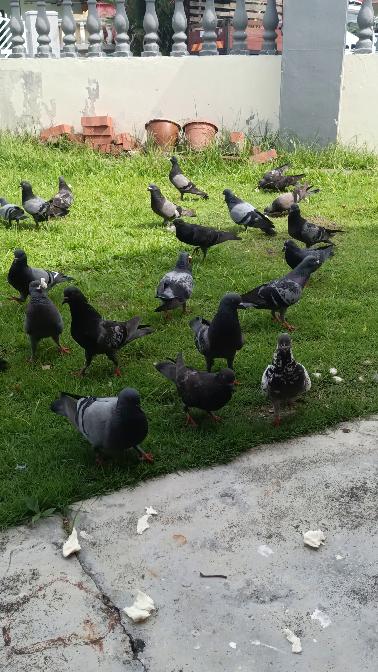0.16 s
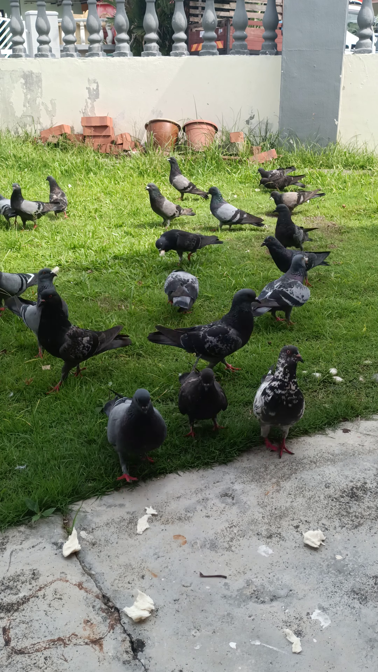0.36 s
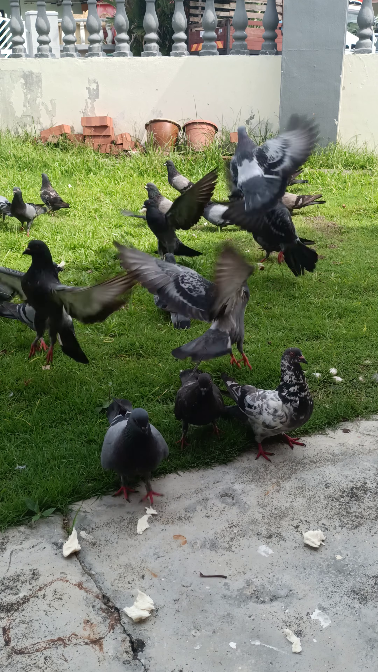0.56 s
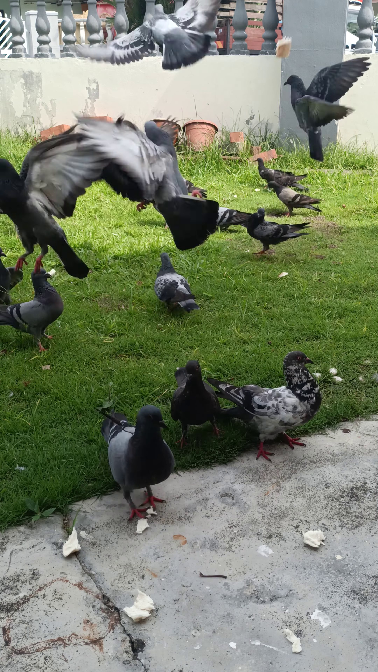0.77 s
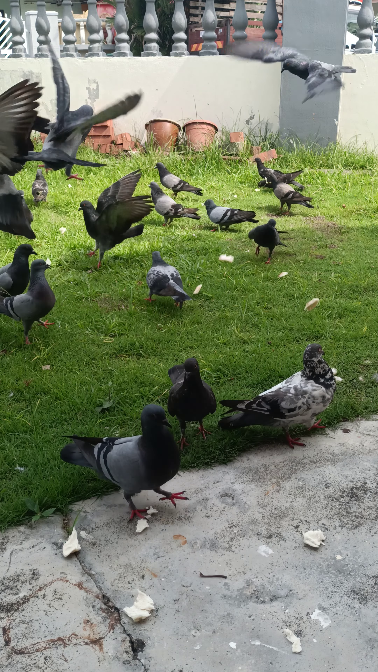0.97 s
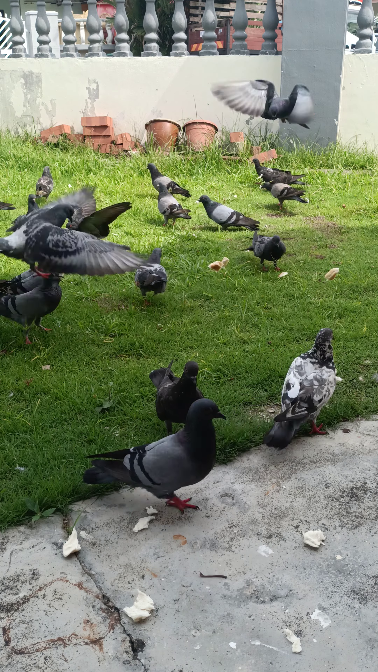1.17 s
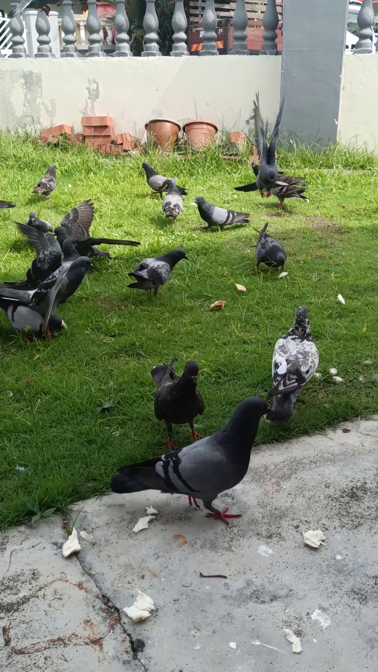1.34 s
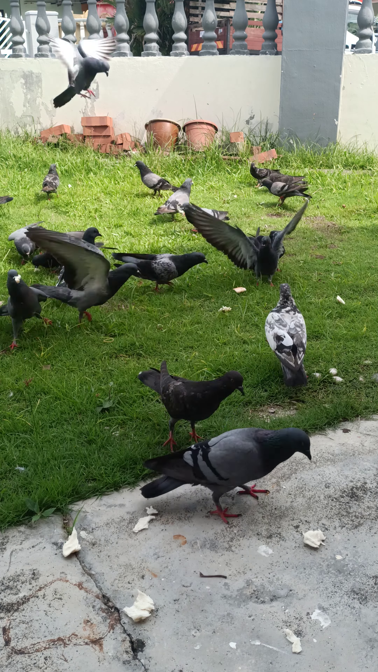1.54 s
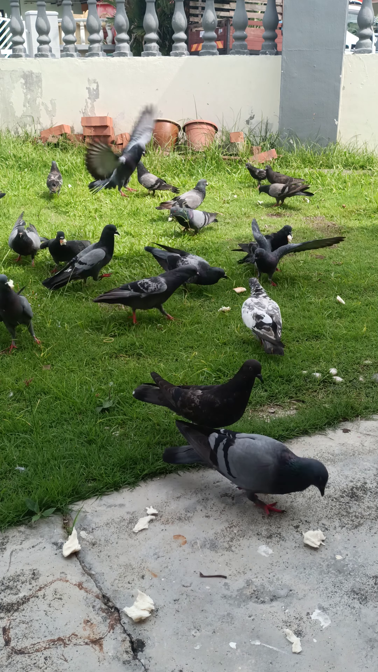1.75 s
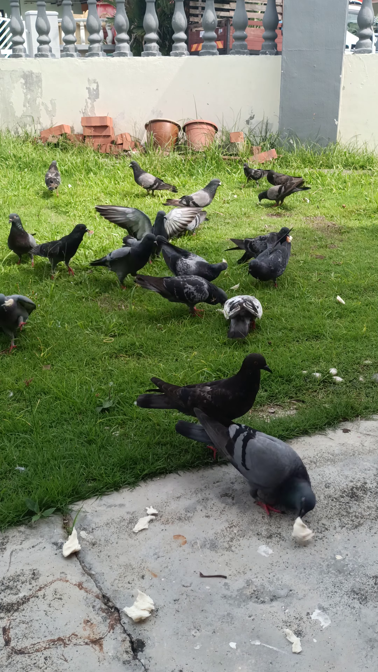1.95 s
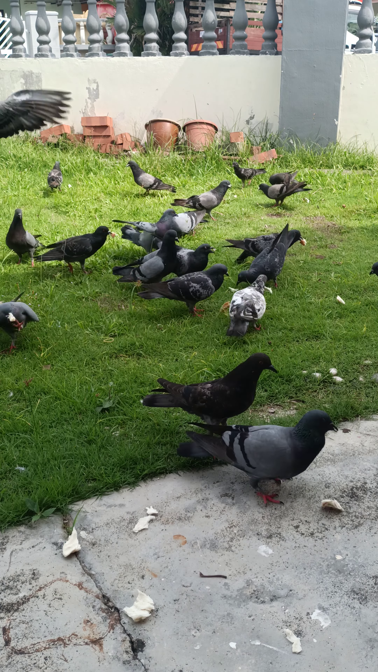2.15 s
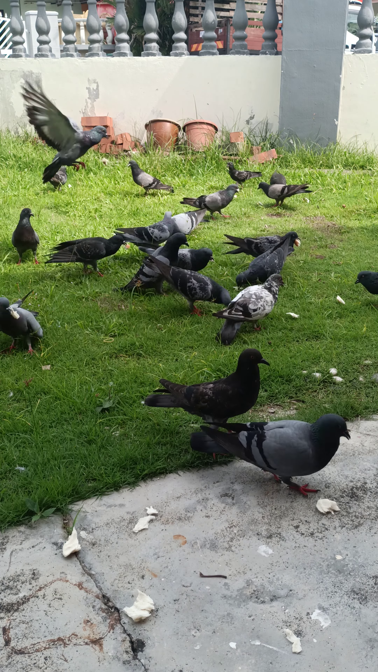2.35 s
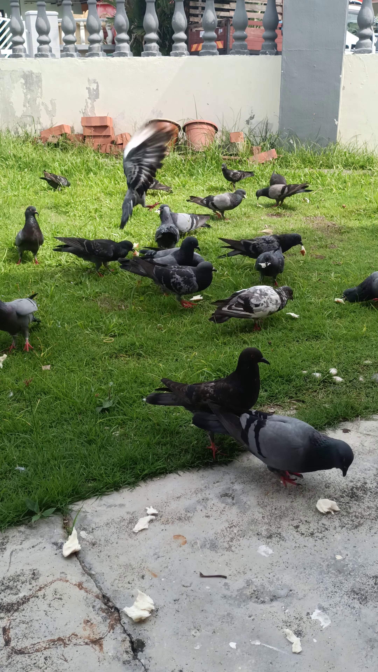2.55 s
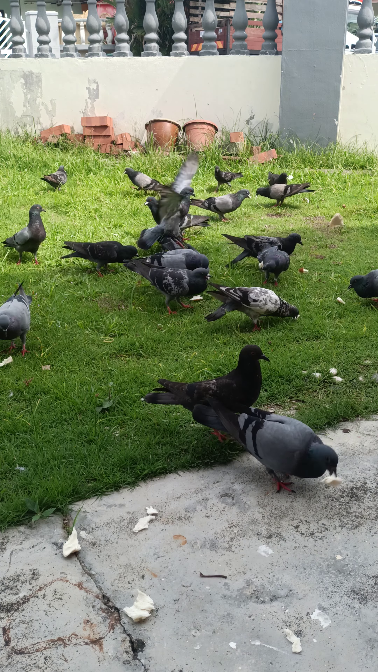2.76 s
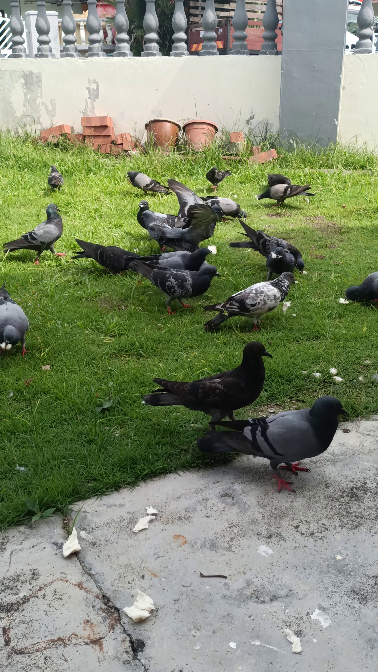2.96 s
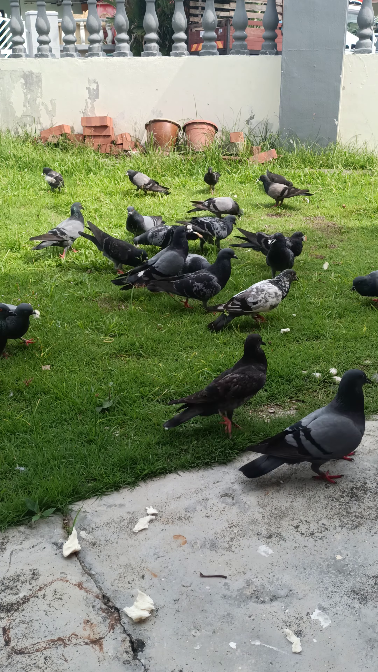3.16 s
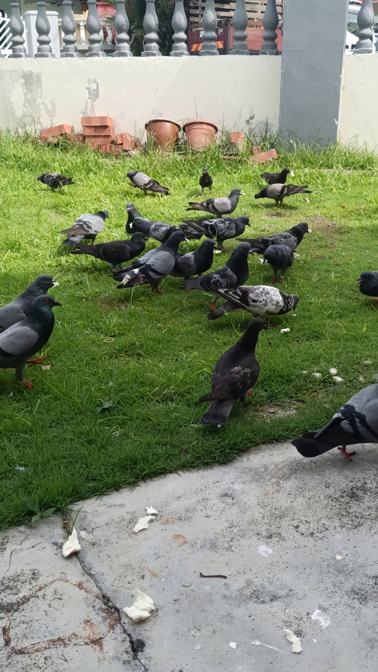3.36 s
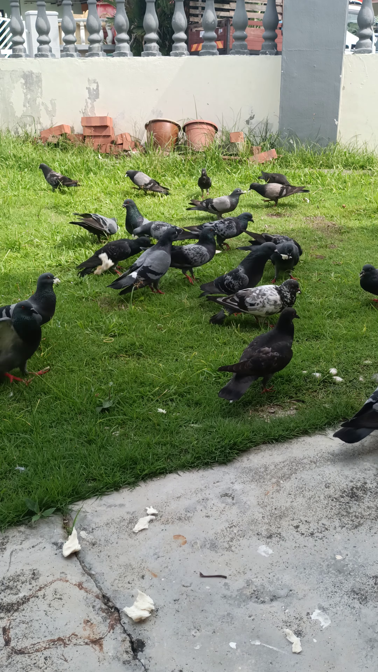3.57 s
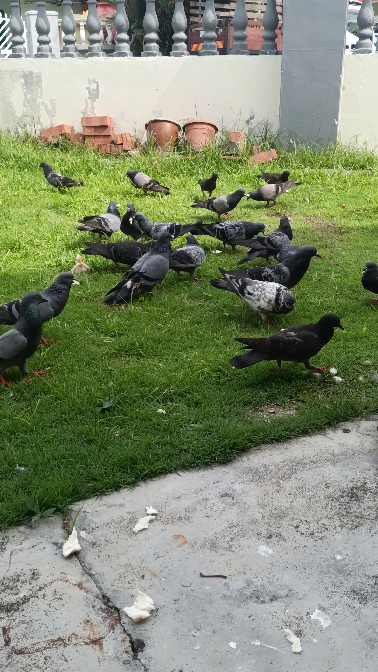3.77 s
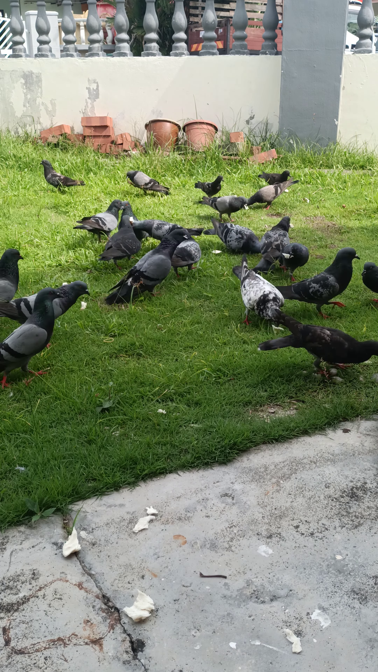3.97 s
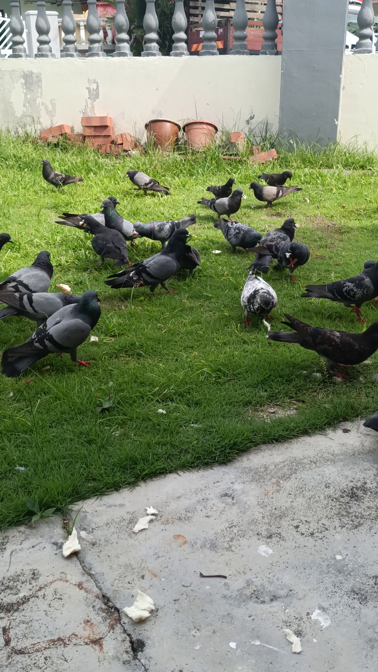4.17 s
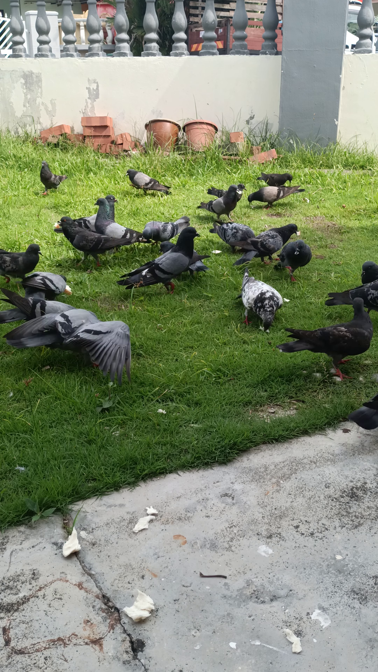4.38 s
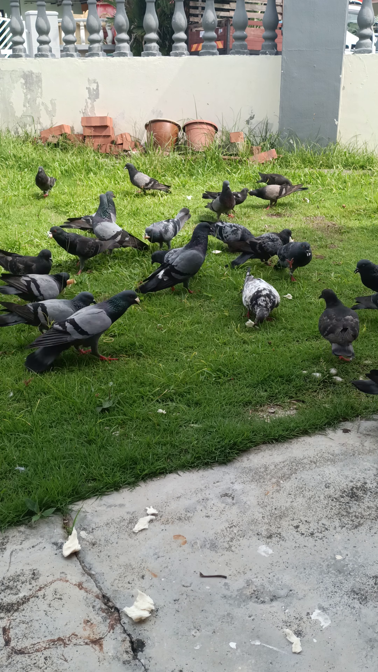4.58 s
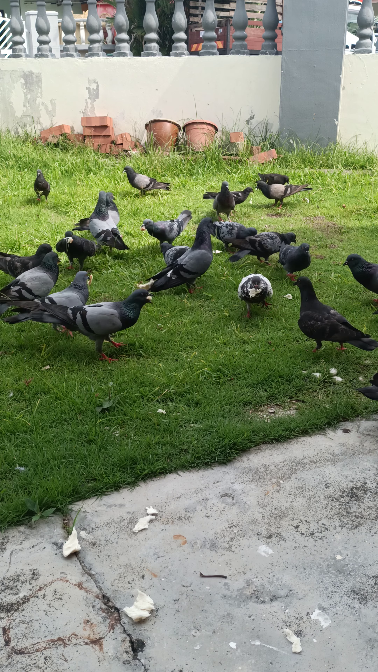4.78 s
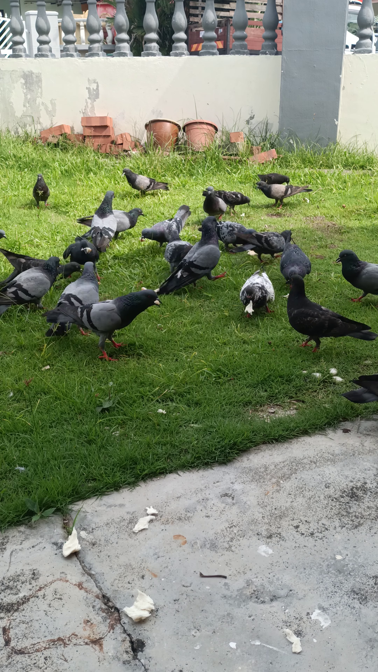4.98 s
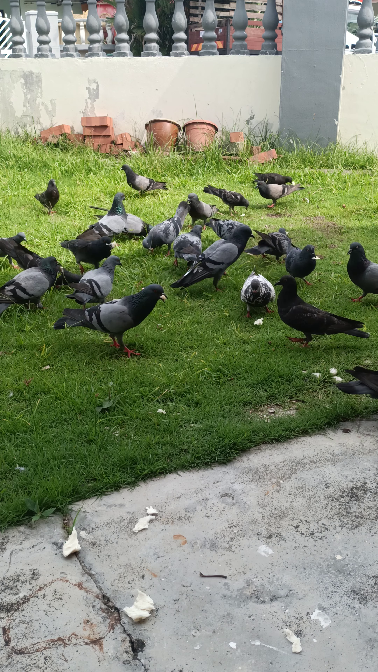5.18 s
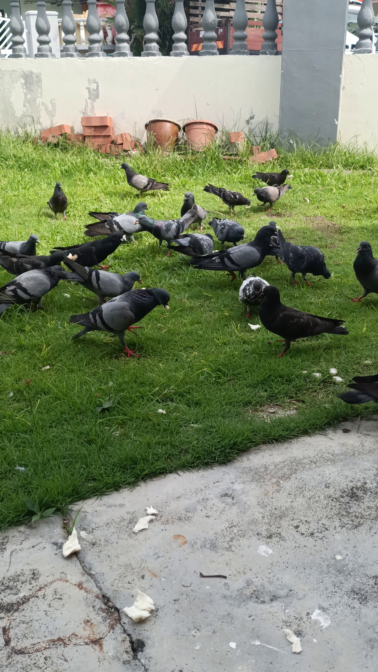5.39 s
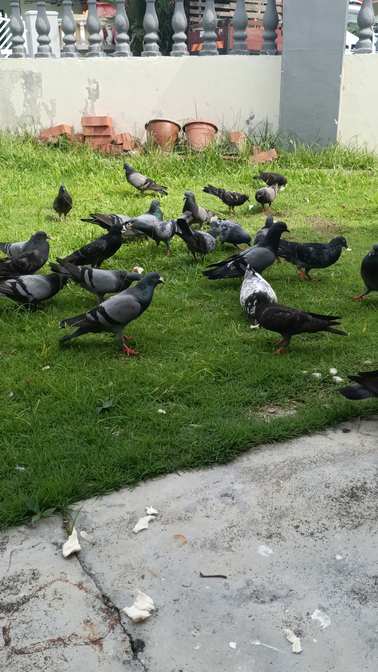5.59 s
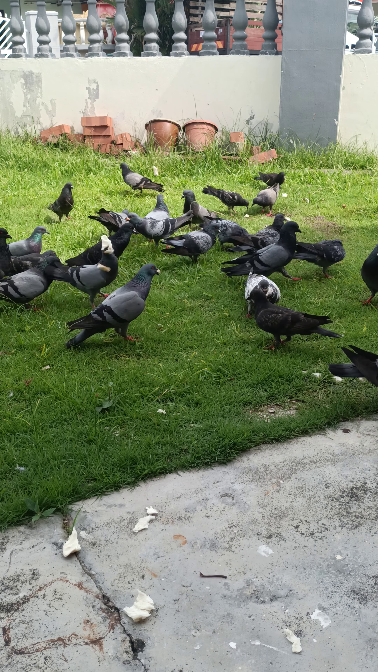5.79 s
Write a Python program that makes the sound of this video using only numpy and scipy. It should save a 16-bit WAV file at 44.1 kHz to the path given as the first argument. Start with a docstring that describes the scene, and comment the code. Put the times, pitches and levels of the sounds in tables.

```python
"""First a soft rustle of feathers over a far traffic hum; then pigeons burst up from a walled lawn with sharp
wing claps. One flies round with whistling beats and lands; later feathers only rustle now and then, beaks tap
and sparrows chirp faintly. Claps are cracks of noise with a ringing air pocket, whistles are blurred partials
on each downstroke, feathers are flickering noise in many bands, and the yard is coloured noise."""
import sys
import numpy as np
from scipy import signal
from scipy.fft import rfft, irfft, next_fast_len
from scipy.io import wavfile

SR = 44100
rng = np.random.default_rng(int(sys.argv[2]) if len(sys.argv) > 2 else 0)


def generate_wav(sig):
    """Save sig (samples, or channels by samples) to the path in sys.argv[1] as 16-bit PCM at SR."""
    pcm = np.round(np.clip(np.atleast_2d(sig).T, -1, 1) * 32767).astype(np.int16)
    wavfile.write(sys.argv[1], SR, pcm)


def attenuation_scalar(level_db):
    """Turn a level in dB into a linear amplitude multiplier (20 dB per decade)."""
    decades = np.asarray(level_db, float) / 20
    return 10 ** decades


N = 257103   # samples
SIZE = next_fast_len(N + 8192)   # transform length, samples
HZ = np.maximum(np.arange(SIZE // 2 + 1) * SR / SIZE, 1)   # frequency of every bin

# Levels and pitches below are nominal: flicker, waver, panning and the microphone come on top.

# colour of the yard: (frequency [Hz], density [dB])
YARD_COLOUR = [(12, -68), (20, -23), (57, -9), (92, -2), (135, -4.5), (190, -13), (240, -15.5), (289, -8.5),
               (420, -14), (620, -16), (760, -24.5), (950, -24), (1840, -29.5), (3200, -30), (6000, -32),
               (9000, -31.5), (13200, -31.5), (15000, -33)]
TRAFFIC_DB, AIR_DB = -58, -62.5
# likeness of left and right for far sounds: (frequency [Hz], correlation [-1 to 1])
FAR_ALIKE = [(60, 1), (150, 0.9), (380, 0.72), (950, 0.17), (2380, 0.0195), (5980, 0.0093), (15000, 0.02)]
# likeness of left and right for near sounds: (frequency [Hz], correlation [-1 to 1])
NEAR_ALIKE = [(60, 0.98), (150, 0.97), (380, 0.86), (950, 0.77), (2380, 0.21), (5980, 0.65), (15000, -0.98)]

# sparrow chirps: (time [s], length [s], pitch [Hz], level [dB])
CHIRPS = [(1.79, 0.071, 4150, -51.5), (2.187, 0.047, 3510, -57), (2.352, 0.055, 3940, -57.5),
          (2.966, 0.11, 4000, -59.5), (3.417, 0.071, 4460, -56.5), (3.658, 0.084, 3190, -59.5),
          (4.03, 0.12, 4270, -67)]
WARBLE_HZ, WARBLE_SWING_HZ, CHIRP_BLUR_DB = 430, 520, -2   # the blur is set against the note
# thin whistles: (time [s], length [s], from pitch [Hz], to pitch [Hz], level [dB])
FAINT_TONES = [(5.035, .11, 1120, 1480, -67), (3.94, .13, 850, 850, -71), (5.62, .05, 1720, 1720, -70)]
# beaks tapping the ground: (time [s], level [dB], middle frequency [Hz])
PECKS = [(2.955, -56, 12000), (3.137, -54.5, 2400), (3.759, -62, 2300), (4.992, -64, 3000),
         (5.248, -59, 2350), (5.258, -59, 2300)]

# downstrokes of the circling bird: (start [s], length [s], whistle level [dB], strongest partial [Hz],
# swish level [dB], peak position [share of stroke], lowest partial against whistle [dB])
STROKES = [(1.446, 0.026, -49.5, 1186, -70, 0.37, -18), (1.578, 0.053, -52.5, 1325, -52.5, 0.39, -4.5),
           (1.691, 0.064, -51, 1214, -49.5, 0.52, -12), (1.821, 0.08, -54, 1244, -55.5, 0.48, -8),
           (1.947, 0.083, -56, 1373, -55.5, 0.41, 1), (2.07, 0.081, -53.5, 1304, -54.5, 0.41, -5),
           (2.204, 0.072, -57.5, 1287, -57, 0.44, -1.5), (2.325, 0.058, -51, 1166, -58.5, 0.23, -10.5),
           (2.456, 0.046, -55, 1134, -61, 0.52, -10), (2.607, 0.047, -54.5, 1457, -66, 0.3, -15),
           (2.723, 0.063, -46, 1453, -53.5, 0.19, -3), (2.828, 0.044, -52.5, 1114, -58, 0.28, 1.5)]
# partials of the whistle: (multiple of the lowest partial, level [dB])
WHISTLE_PARTIALS = [(2, 1), (3, -8.5), (4, -13), (5, -27), (6, -28)]
WHISTLE_LEAD_S, STROKE_EDGE_S = 0.00404, 0.022   # whistle starts early; strokes spill past their ends
WHISTLE_SHARPNESS, SWISH_SHARPNESS = 1.8, 0.71   # exponents of the humps
STROKE_HISS_DB, STROKE_PUMP_DB, STROKE_WHOOSH_DB = -3.5, -18, -7.5   # against the swish
WHOOSH_LOW_HZ, WHOOSH_HIGH_HZ = 900, 4000
STROKE_PAN_DB, FLOCK_PAN_DB = 4.5, 0.5   # left against right
# short feather whistle notes, within a stroke or alone: (middle [s], length [s], pitch [Hz], level [dB])
FEATHER_NOTES = [(1.195, 0.039, 1220, -55), (1.322, .02, 1215, -45), (1.868, .03, 1106, -55),
                 (1.962, 0.021, 1226, -58), (1.995, 0.011, 1190, -44.5), (2.124, 0.032, 1117, -49),
                 (2.22, 0.016, 1230, -49.5), (2.251, .018, 1283, -43.5), (2.312, 0.013, 1280, -55),
                 (2.343, 0.022, 1165, -44.5), (2.473, .03, 1129, -44.5), (2.504, 0.023, 1078, -51.5),
                 (2.638, .02, 1120, -55), (2.727, 0.022, 1404, -42.5), (2.755, 0.037, 1185, -51)]
FEATHER_SAG = 0.046   # share of pitch lost over the note

# single wings shove a lump of air: (middle [s], length [s], pitch [Hz], level [dB])
WHUMPS = [(.636, .025, 397, -38), (.701, .022, 392, -27), (.72, .018, 367, -29), (.752, 0.015, 388, -32.5),
          (.79, 0.017, 295, -29), (.826, 0.022, 318, -30), (.848, .025, 335, -34), (.868, 0.017, 325, -34),
          (.89, .025, 411, -34.5), (.937, 0.011, 760, -34.5), (.955, 0.022, 412, -44),
          (1.241, 0.016, 288, -43.5), (1.363, 0.016, 444, -34), (1.397, 0.026, 460, -41),
          (2.711, .022, 303, -48)]
# the flock takes off and settles: (time [s], feather hiss [dB], wing rush [dB])
FLURRY = [(0.38, -71, -80), (0.488, -63, -66), (0.564, -48, -44), (0.688, -35.5, -46), (0.74, -40.5, -40.5),
          (0.84, -42, -35.5), (0.888, -45, -38.5), (1.006, -57, -51.5), (1.056, -52.5, -59),
          (1.244, -47, -49), (1.5, -52.5, -56), (1.95, -57, -61), (2.4, -64.5, -65.5), (2.66, -64, -59.5),
          (2.92, -65, -74), (3.3, -66, -65.5), (3.8, -65, -69.5), (4.0, -101, -88)]
# air pushed by the take-off: (time [s], pumped air [dB], gust [dB])
DRAUGHT = [(0.48, -62, -70), (0.62, -56, -67), (0.66, -39, -44), (0.72, -44, -60), (0.8, -39.5, -37.5),
           (0.86, -36, -46), (0.94, -48, -54.5), (1.16, -62.5, -58), (1.25, -48, -64), (1.31, -58.5, -62),
           (1.37, -50, -49), (1.46, -61.5, -57), (2.3, -66.5, -65), (3.0, -61.5, -66.5)]
# shaken plumage: (middle [s], length [s], hiss [dB], rush [dB])
RUSTLES = [(0.141, 0.1, -58, -70), (0.273, 0.044, -63.5, -85), (0.512, 0.036, -49, -55),
           (2.029, 0.047, -46, -69), (2.582, 0.016, -51.5, -72), (2.624, 0.17, -63, -70),
           (3.077, .04, -68, -84), (3.568, 0.13, -60, -70), (3.695, 0.087, -57.5, -65),
           (4.056, 0.041, -67, -72), (4.317, 0.074, -54, -60), (4.356, 0.044, -62, -67),
           (4.404, 0.092, -56.5, -63), (4.435, .014, -62, -67), (4.656, 0.027, -68, -79),
           (4.722, 0.046, -69, -74), (4.996, .03, -60.5, -70), (5.223, 0.05, -68, -72),
           (5.282, 0.14, -62.5, -67.5), (5.49, .05, -71, -87), (5.782, 0.16, -65.5, -79)]
RAGGED_DB = 2.2   # spread of the fast unevenness in rustles and strokes
GRAINS_PER_S, GRAIN_DB, GRAIN_S = 400, -8, 0.0012   # barbs slipping over each other
# colour of wing noise: (frequency [Hz], density [dB])
WING_COLOUR = [(290, -30), (500, -3.5), (966, -6.5), (1330, -5), (2190, -5), (3300, -7), (4700, -10.5),
               (5700, -7.5), (6600, -8), (7600, -6.5), (10500, -8), (13200, -10), (15000, -10)]

# wing claps and snaps: (time [s], level [dB], air pocket [Hz], pocket against clap [dB],
# tail against clap [dB], treble against clap [dB], build-up [ms])
CLAPS = [(0.184, -54.5, 790, -25, -12.5, 9.5, 1.04), (0.416, -44, 2510, -28, -8, -9, 4),
         (0.516, -20.5, 1640, -9.5, -9.5, 1, 1.86), (0.634, -18.5, 1000, -15.5, -16, 0, 1.2),
         (0.655, -18, 1470, -11, -10, -16, 3.4), (0.667, -11.5, 1160, -10, -25, -1, 1.5),
         (0.7508, -5, 2160, -8, -20, 0.5, 1.54), (0.7875, -4, 1100, -18.5, -25.5, -5, 1.55),
         (0.872, -16.5, 1095, -5.5, -17.5, 1, 2.13), (0.878, -18, 1100, -11, -20.5, 1.5, 1.5),
         (0.961, -29.5, 740, -20, -23, 9.5, 1.5), (0.9924, -12.5, 920, -8, -12.5, -2.5, 2.03),
         (1.157, -31.5, 1290, -13, -15.5, -1.5, 1.8), (1.238, -30, 1330, -8, -9, -11, 3.4),
         (1.273, -26, 775, -13, -13, -3, 2.4), (1.307, -33.5, 1280, -15, -10, -2.5, 2.5),
         (1.356, -19, 1883, -5.5, -14, -4, 1.96), (1.412, -42, 2280, -3, -26, 17, 0.46),
         (2.448, -49.5, 1110, 2, -11, 4, 1.2), (2.699, -29, 1220, -15, -11.5, -8.5, 1.2),
         (3.649, -45.5, 950, -11, -24, 4, 0.55)]
# echoes from ground and walls: (delay [s], level [dB])
WALLS = [(.003, -5), (.0065, -9), (0.018, -14), (0.036, -15)]

# treble balance of the two microphone ports: (frequency [Hz], left against right [dB])
PORTS = [(60, 0.5), (260, -1), (1100, 0), (2400, -1), (5000, 5.5), (7200, 1), (10400, -8.5), (13000, 4.5),
         (15000, 17)]
# peaks and dips of the left port alone: (frequency [Hz], width [Hz], level [dB])
LEFT_PORT = [(6620, 450, 9), (8300, 800, -8), (13500, 400, -6), (14000, 300, 4), (15450, 450, 2.5)]


def rms_one(x):
    """Scale to rms 1."""
    return x / np.sqrt(np.mean(x ** 2) + 1e-20)


def in_time(rows, outside):
    """Columns of a table at every sample."""
    s, *columns = np.transpose(rows)
    return [np.interp(np.arange(N) / SR, s, c, left=outside, right=outside) for c in columns]


def at_hz(points):
    """A table over log frequency, at every bin."""
    hz, value = np.transpose(points)
    return np.interp(np.log(HZ), np.log(hz), value)


def band(low_hz, high_hz):
    """Gain of a soft-edged band, at every bin."""
    return 1 / np.sqrt((1 + (low_hz / HZ) ** 6) * (1 + (HZ / high_hz) ** 6))


def pan(left_over_right_db):
    """Gains of the left and right side."""
    return attenuation_scalar(left_over_right_db / 2 * np.array([[1], [-1]]))


def drift(rate_hz):
    """Smoothed random wander, rms 1; a higher rate wanders faster."""
    r = np.exp(-2 * np.pi * rate_hz / SR)
    wander = signal.lfilter([1], [1, -2 * r, r * r], rng.standard_normal(N + SR))
    return rms_one(wander[SR:])   # the first second only warms up the filter


def noise(gain, alike, lag_s):
    """Coloured stereo noise, rms 1; the left side hears it later."""
    mid, side = rfft(rng.standard_normal((2, SIZE)))
    alike = np.clip(at_hz(alike), -1, 1)
    pair = gain * (np.sqrt(1 + alike) * mid + np.sqrt(1 - alike) * side * [[1], [-1]])
    pair[0] *= np.exp(-2j * np.pi * HZ * lag_s)
    return rms_one(irfft(pair, SIZE)[:, :N])


def swell(start, length, peak_share, sharpness):
    """A hump from silence to 1 and back, its top at the given share of its length."""
    out, first = np.zeros(N), round(start * SR)
    u = np.arange(min(round(length * SR), N - first)) / (length * SR)
    bent = u ** (np.log(0.5) / np.log(np.clip(peak_share, 0.15, 0.85)))
    out[first:first + len(u)] = np.sin(np.pi * bent) ** sharpness
    return out


def bursts(rows, sag, rough, octave_db, peak_share):
    """Short humps of a tone that sags, with its octave, widened into a band by turbulence."""
    out = np.zeros(N)
    air = 1 + rough * (drift(110) + 1j * drift(110))
    for s, length, hz, db in rows:
        start = s - length / 2
        i = slice(round(start * SR), round((s + length / 2) * SR))
        pitch = hz * (1 + sag * np.linspace(0.5, -0.5, i.stop - i.start))
        phase = rng.uniform(0, 2 * np.pi) + 2 * np.pi * np.cumsum(pitch) / SR
        turn = np.exp(1j * phase)
        tone = np.real((turn + attenuation_scalar(octave_db) * turn ** 2) * air[i])
        out[i] += attenuation_scalar(db) * swell(start, length, peak_share, 1.3)[i] * tone
    return out


def yard():
    """Distant traffic and air: coloured noise split at 700 Hz, each part wavering in level."""
    colour = attenuation_scalar(at_hz(YARD_COLOUR))
    low = band(1, 700)
    hum = attenuation_scalar(TRAFFIC_DB + 0.5 * drift(6)) * noise(colour * low, FAR_ALIKE, 0.00004)
    air = attenuation_scalar(AIR_DB + 0.44 * drift(2.0)) * noise(colour * np.sqrt(1 - low ** 2), FAR_ALIKE, 0)
    return hum + air


def faint_tones():
    """Thin notes, level or sliding upward, with an unsteady loudness."""
    out, waver = 0, attenuation_scalar(4 * drift(45))
    for s, length, from_hz, to_hz, db in FAINT_TONES:
        pitch = np.interp(np.arange(N) / SR, [s, s + length], [from_hz, to_hz])
        tone = np.sin(2 * np.pi * np.cumsum(pitch) / SR)
        out = out + attenuation_scalar(db) * waver * swell(s, length, 0.56, 0.8) * tone
    return out


def sparrows():
    """Far chirps: a fast warble splits the note into a comb of lines; distance blurs part of it into a band."""
    out, t = np.zeros((2, N)), np.arange(N) / SR
    warble_rate = WARBLE_HZ * (1 + 0.09 * drift(40))
    warble = WARBLE_SWING_HZ * np.sin(2 * np.pi * np.cumsum(warble_rate) / SR)
    for s, length, hz, db in CHIRPS:
        u = np.clip((t - s) / length, 0, 9)
        shape = 8 * u / (1 + 8 * u) * np.exp(-1.5 * u ** 2)   # quick rise, rounded fall
        pitch = hz * (1 + 0.022 * drift(40)) + warble
        note = np.sin(2 * np.pi * np.cumsum(pitch) / SR)
        blur = attenuation_scalar(CHIRP_BLUR_DB) * noise(band(0.85 * hz, 1.2 * hz) ** 3, FAR_ALIKE, 0)
        out += attenuation_scalar(db + 2.5 * drift(60)) * shape * (note + blur)
    return out


def pecks():
    """Beaks on the ground: dry knocks of a few ms, noise an octave wide."""
    out = np.zeros((2, N))
    for s, db, hz in PECKS:
        u = np.maximum(np.arange(N) / SR - s, 0) / 0.0023   # the knock peaks after 2.3 ms
        knock = noise(band(hz / np.sqrt(2), hz * np.sqrt(2)) ** 4, NEAR_ALIKE, 0)
        out += attenuation_scalar(db) * u * np.exp(1 - u) * knock
    return out


def whistles():
    """A flight feather flutters on each downstroke; its pitch arches with wing speed and wavers."""
    out = bursts(FEATHER_NOTES, FEATHER_SAG, rough=0.18, octave_db=-11, peak_share=0.3)
    waver = 0.035 * drift(45)
    # turbulence spreads each upper partial into a narrow band of its own
    spread = [0.7 + 0.45 * (drift(100) + 1j * drift(100)) for _ in WHISTLE_PARTIALS]
    lowest = 1 + 0.3 * drift(50)
    for s, length, db, hz, _, share, low_db in STROKES:
        start, length = s - WHISTLE_LEAD_S, length + WHISTLE_LEAD_S + STROKE_EDGE_S
        i = slice(round(start * SR), round((start + length) * SR))
        arch = 0.086 * (swell(start, length, 0.435, 0.99)[i] - 0.8)
        pitch = hz / 2 * (1 + arch + waver[i])   # the strongest partial is the second
        phase = 2 * np.pi * np.cumsum(pitch) / SR
        tone = attenuation_scalar(low_db) * np.exp(1j * phase) * lowest[i]
        for (k, level_db), air in zip(WHISTLE_PARTIALS, spread):
            tone += attenuation_scalar(level_db) * np.exp(1j * k * phase) * air[i]
        out[i] += np.real(tone) * attenuation_scalar(db) * swell(start, length, share, WHISTLE_SHARPNESS)[i]
    return out * pan(STROKE_PAN_DB)


def whumps():
    """Low lumps of air shoved by single wings, reaching the left side later."""
    low = bursts(WHUMPS, sag=0.05, rough=0.3, octave_db=-18, peak_share=0.45)
    return np.array([np.roll(low, 8), low])


def grains():
    """Gain that jumps briefly whenever barbs slip; rms 1."""
    slips = (rng.random(N) < GRAINS_PER_S / SR) * rng.exponential(1, N)
    r = np.exp(-1 / (GRAIN_S * SR))
    jumps = signal.lfilter([1 - r], [1, -r], signal.lfilter([1], [1, -r], slips))
    return rms_one(1 + attenuation_scalar(GRAIN_DB) * jumps)


def patchy(low_hz, high_hz, depth_db, count):
    """Wing noise in neighbouring bands that each swell and fade on their own."""
    edges, wing = np.geomspace(low_hz, high_hz, count + 1), attenuation_scalar(at_hz(WING_COLOUR))
    out = np.zeros((2, N))
    for low, high in zip(edges, edges[1:]):
        part = wing * band(low, high) ** 4
        level = np.sqrt(np.mean(part ** 2)) * attenuation_scalar(depth_db * drift(18.5))
        out += level * noise(part, NEAR_ALIKE, 0.000204)
    return rms_one(out)


def feathers():
    """Air tearing through vanes: hiss and rush flicker together, the beat pumps low air."""
    # layers add up as powers
    hiss, rush = attenuation_scalar(np.array(in_time(FLURRY, -120))) ** 2
    pump, gust = attenuation_scalar(np.array(in_time(DRAUGHT, -120))) ** 2
    whoosh = np.zeros(N)
    for s, length, _, _, db, _, _ in STROKES:
        hump = swell(s - STROKE_EDGE_S, length + 2 * STROKE_EDGE_S, 0.44, SWISH_SHARPNESS)
        power = (attenuation_scalar(db) * hump) ** 2
        whoosh = whoosh + power
        hiss = hiss + power * attenuation_scalar(STROKE_HISS_DB) ** 2
        rush = rush + power
        pump = pump + power * attenuation_scalar(STROKE_PUMP_DB) ** 2
    ragged = attenuation_scalar(RAGGED_DB * drift(61))
    for s, length, hiss_db, rush_db in RUSTLES:
        power = (ragged * swell(s - length / 2, length, 0.46, 1.1)) ** 2
        hiss = hiss + power * attenuation_scalar(hiss_db) ** 2
        rush = rush + power * attenuation_scalar(rush_db) ** 2
    flicker = attenuation_scalar(0.49 * drift(27))
    out = np.sqrt(hiss) * flicker * grains() * patchy(4800, 17000, 3, count=16)
    out += np.sqrt(rush) * flicker * np.sqrt(grains()) * patchy(600, 4800, 3.5, count=18)
    # air roaring round the whistling feather
    roar = noise(band(WHOOSH_LOW_HZ, WHOOSH_HIGH_HZ) ** 2, NEAR_ALIKE, 0.00023)
    out += np.sqrt(whoosh) * ragged * attenuation_scalar(STROKE_WHOOSH_DB) * roar
    out += np.sqrt(pump) * attenuation_scalar(drift(24)) * noise(band(211, 504) ** 2, NEAR_ALIKE, 0.00019)
    return out + np.sqrt(gust) * noise(band(50.0, 171.0) ** 2, NEAR_ALIKE, 0)


def walls(x):
    """A few smeared echoes from ground and walls, later ones more drawn out; the sides share part of the smear."""
    shared = rng.standard_normal((len(WALLS), 900))
    own = np.diff(rng.standard_normal((2, len(WALLS), 901)))
    out = np.zeros((2, N))
    for side in range(2):
        for (s, db), grain in zip(WALLS, (shared + own[side]) / 2):
            lag = round(s * SR)
            fade = np.exp(-np.arange(900) / (60 + 0.25 * lag))
            smear = grain * fade / np.sqrt(np.sum(fade ** 2))
            out[side, lag:] += attenuation_scalar(db) * signal.fftconvolve(x[side], smear)[:N - lag]
    return out


def claps():
    """A crack of a few ms, the trapped air pocket rings briefly, the feathers swish on after."""
    # crack and tail hold a body row and a treble row
    crack, tail, pocket = np.zeros((2, N)), np.zeros((2, N)), np.zeros(N)
    t = np.arange(SR // 2) / SR
    for s, db, hz, pocket_db, tail_db, treble_db, build_ms in CLAPS:
        i = round(s * SR)
        u = t[:N - i]
        here = slice(i, i + len(u))
        rise = build_ms / 1000
        split = attenuation_scalar(np.array([[-3], [treble_db]]))
        snap = attenuation_scalar(-12.0 + 0.18 * treble_db) * np.exp(-((u - rise) / 0.0001) ** 2)   # the tips meet
        burst = attenuation_scalar(-9.5) * u / rise * np.exp(1 - u / rise)
        crack[:, here] += split * attenuation_scalar(db) * (snap + burst)
        fall_db = 60 * u / 0.27   # 60 dB in 0.27 s
        tail[:, here] += split * attenuation_scalar(db + tail_db - fall_db) * (1 - np.exp(-u / (0.0051 + rise)))
        v = u / (rise + 0.23 / hz)
        pocket[here] += attenuation_scalar(db + pocket_db) * (v * np.exp(1 - v)) ** 2 * np.sin(2 * np.pi * hz * u)
    wing = attenuation_scalar(at_hz(WING_COLOUR))
    body, treble = wing * band(540, 5350), wing * band(4740, 19000)
    direct = crack[0] * noise(body, NEAR_ALIKE, 0.00019) + crack[1] * noise(treble, NEAR_ALIKE, 0.000195)
    swish = tail[0] * noise(body, NEAR_ALIKE, 0.0002) + tail[1] * noise(treble, NEAR_ALIKE, 0.000206)
    puff = np.array([np.roll(pocket, 6), pocket])   # left side later
    return direct + attenuation_scalar(-12) * puff, puff + swish


def scene():
    """Everything in the yard; only the first part of the claps sends echoes off the walls."""
    direct, tail = claps()
    flock = direct + walls(direct) + tail + feathers() + whumps()
    background = yard() + faint_tones() + sparrows() + pecks()
    return flock * pan(FLOCK_PAN_DB) + whistles() + background


def top_cut(x):
    """Nothing passes above the cut-off."""
    return signal.sosfilt(signal.butter(12, 17150, fs=SR, output="sos"), x)


def record(dry):
    """Two microphone ports in one shell, each with its own treble colour; peaks are rounded."""
    tilt_db = at_hz(PORTS) / 2
    left_db = tilt_db + sum(db / (1 + (2 * (HZ - hz) / width) ** 2) for hz, width, db in LEFT_PORT)
    top = 1 / (1 + (HZ / 15740) ** 400)   # steep upper limit
    ports = attenuation_scalar(np.array([left_db, -tilt_db])) * top
    x = irfft(rfft(dry, SIZE) * ports, SIZE)[:, :N]
    mix = 0.85 * np.tanh(x / 0.85)
    return top_cut(mix)


dry = scene()
out = record(dry)
generate_wav(out)
```